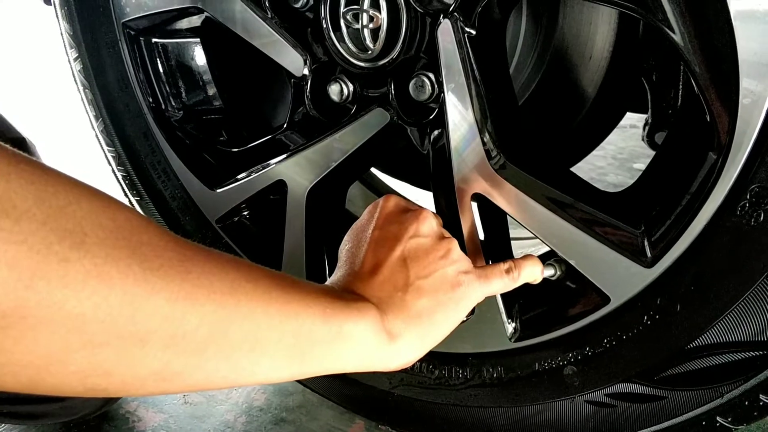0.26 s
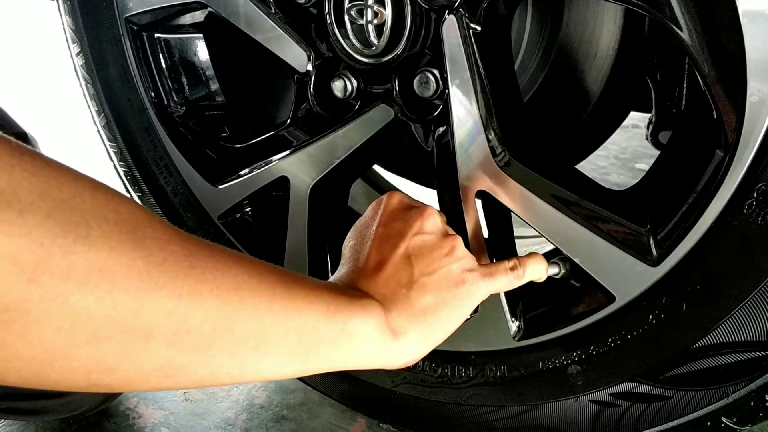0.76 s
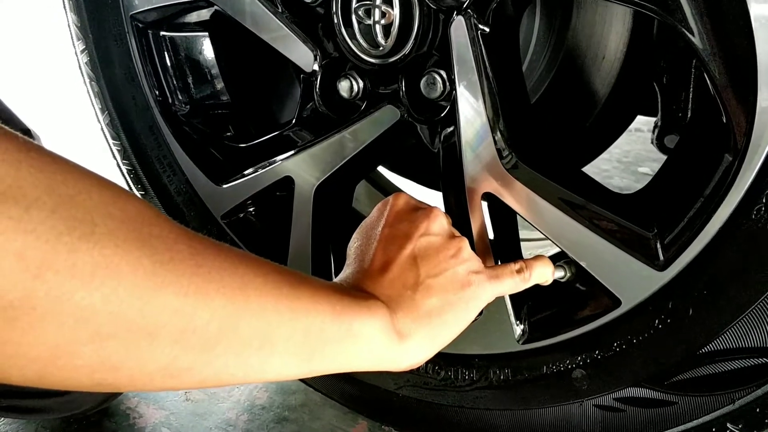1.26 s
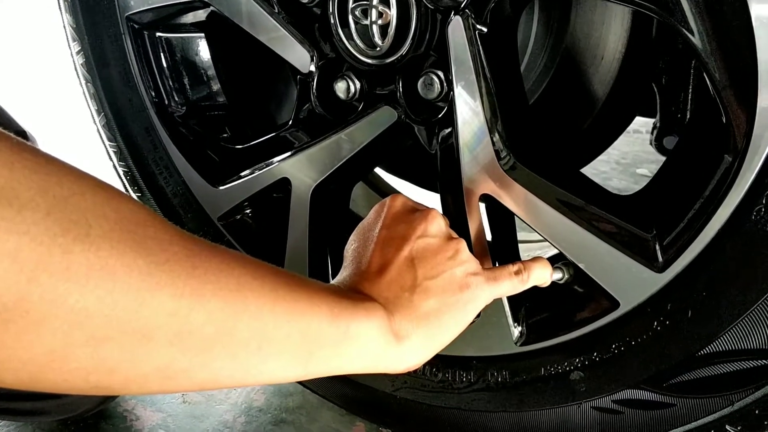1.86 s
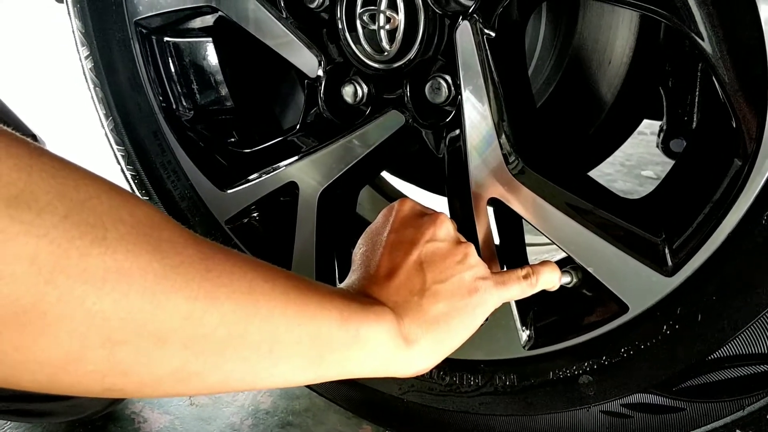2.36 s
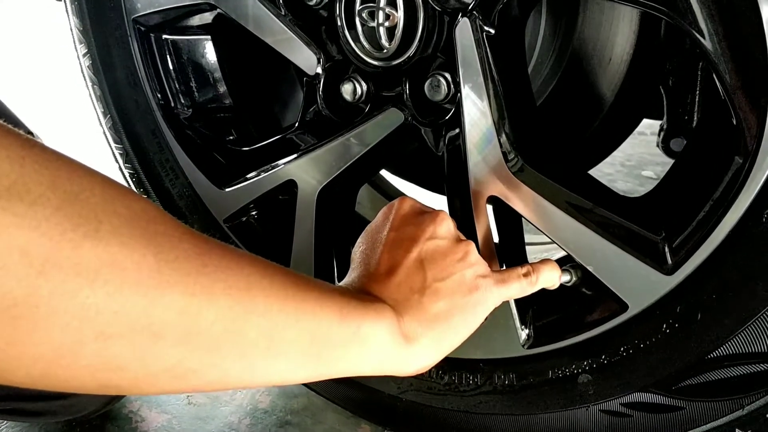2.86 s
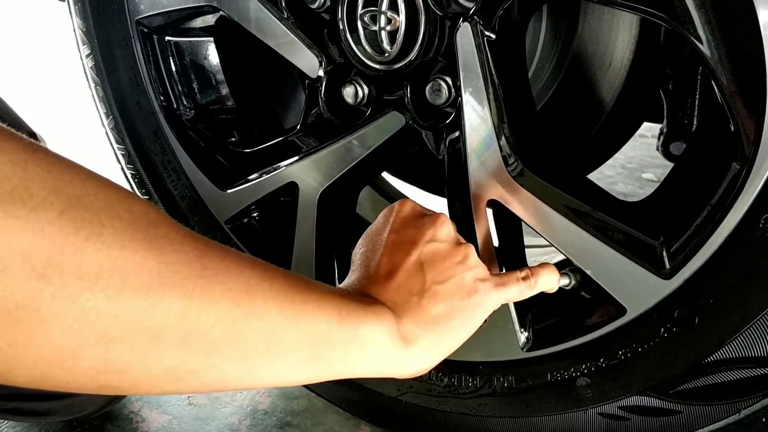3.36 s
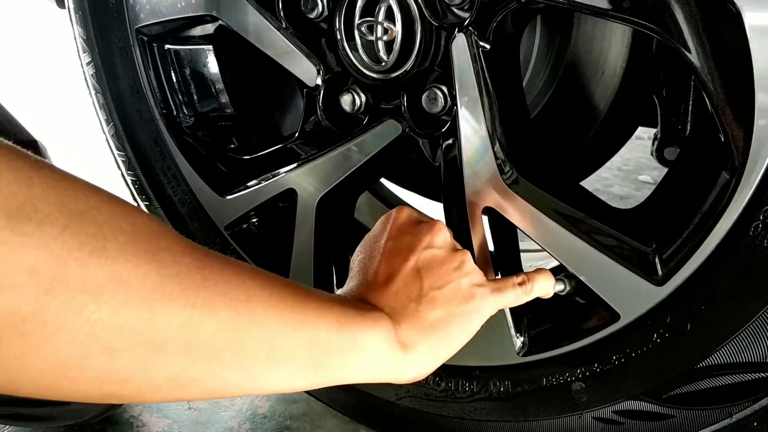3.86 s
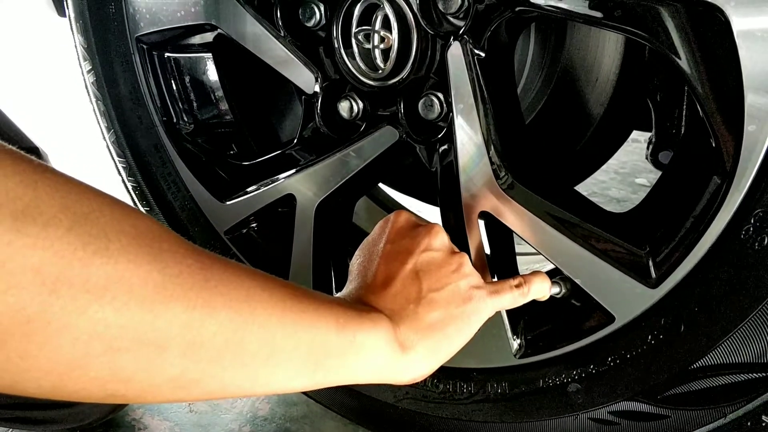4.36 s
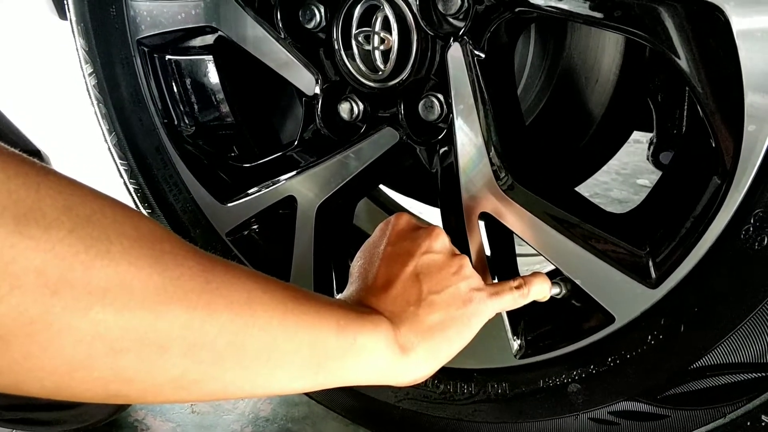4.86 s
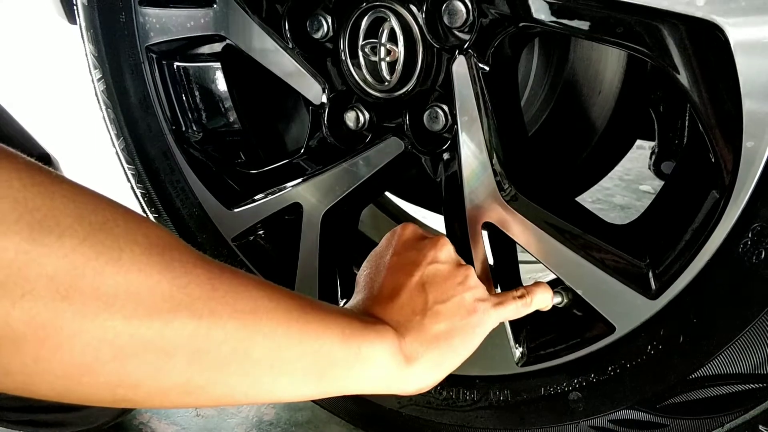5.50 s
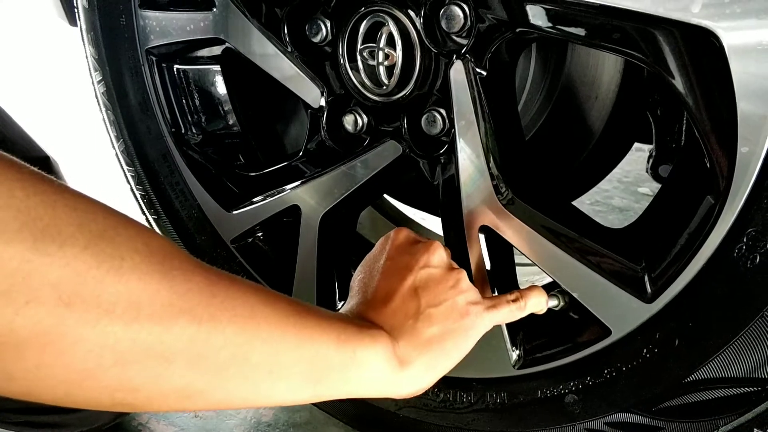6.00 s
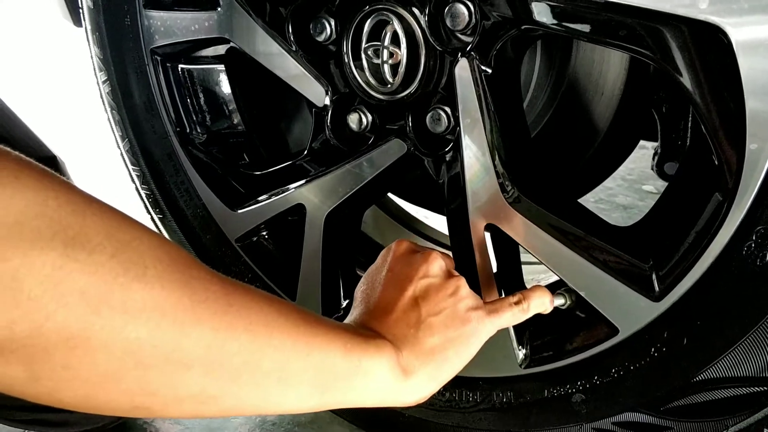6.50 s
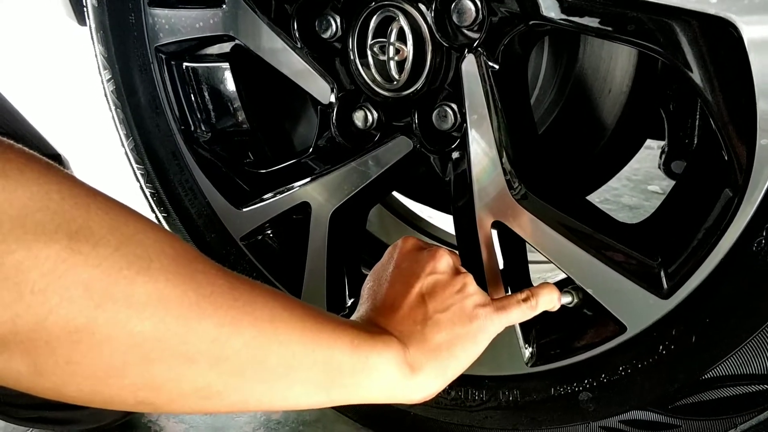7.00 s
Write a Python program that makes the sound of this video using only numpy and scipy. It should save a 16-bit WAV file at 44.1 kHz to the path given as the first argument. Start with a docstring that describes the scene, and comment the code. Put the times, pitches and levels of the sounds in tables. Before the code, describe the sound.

From the first instant, a loud, bright jet of air hisses from a car tyre valve close to a phone microphone, concentrated in the highs around 6 to 10 kHz with fine turbulent flicker and narrow metallic colouring. It eases slightly until 2.5 s, then sags and wavers. Between 2.8 and 3.5 s a dull, lumpy, hollow whoosh passes faintly underneath. From 3.7 to 5.1 s the hiss is clearly weaker and a little less bright, swelling at 5.3 s. Around 5.5 to 6.0 s it sputters: a deep dip, a short burst near 5.75 s, another dip. By 6.25 s it surges back to full strength and holds, still hissing when the sound cuts at about 7.2 s. A quiet low workshop rumble throbs throughout, mostly masked. Very short, dense wheel and floor reflections; mono, thin bass, steeply limited top.

```python
"""In a workshop, a fingertip holds down the pin of a car tyre valve, close to a mono phone microphone.
A low rumble is noise in throbbing bands; a dull whoosh is noise that passes once, in uneven bursts.
The air jet is flickering noise that swells and sags with the finger's pressure, coloured by spokes and rim;
dense reflections from wheel, arch and floor follow it."""
import sys
import numpy as np
from scipy import signal
from scipy.fft import rfft, irfft, next_fast_len
from scipy.io import wavfile
from scipy.ndimage import uniform_filter1d

SR = 44100
rng = np.random.default_rng(int(sys.argv[2]) if len(sys.argv) > 2 else 0)


def wrap_up_sound(samples):
    """Save the sound to the file named by the first command line argument, as 16-bit audio."""
    columns = np.atleast_2d(samples).T
    # keep every value between -1 and 1, then stretch to whole-number steps
    tamed = np.clip(columns, -1, 1)
    steps = np.round(tamed * 32767).astype(np.int16)
    wavfile.write(sys.argv[1], SR, steps)


N = 319271
SIZE = next_fast_len(N)
HZ = np.arange(SIZE // 2 + 1) * SR / SIZE + 1  # bin frequencies, raised 1 Hz so that their log exists


def undb(db):
    """Decibels are logarithmic: 20 dB is a factor of ten in amplitude."""
    return 10 ** (np.asarray(db) / 20)


def curve(rows):
    """Linear interpolation turns each column of a time table into a control signal."""
    seconds, *columns = np.transpose(rows)
    return [np.interp(np.arange(N) / SR, seconds, column) for column in columns]


def walk(rate):
    """Smoothed random process: levels held 1 / rate seconds, averaged twice, scaled to spread 1."""
    hold = int(SR / rate)
    steps = np.repeat(rng.standard_normal(N // hold + 1), hold)
    smooth = uniform_filter1d(uniform_filter1d(steps, hold), hold)[:N]
    return smooth / smooth.std()


def colour(x, gain_db):
    """Linear filtering: each frequency bin is multiplied by its own gain."""
    return irfft(rfft(x, SIZE) * undb(gain_db), SIZE)[:N]


def spectrum(points):
    """Spectral envelope in dB, linear in log frequency between points and falling away outside them."""
    hz, db = np.transpose(points)
    return np.interp(np.log(HZ), np.log([1, *hz, SR]), [db[0] - 43, *db, db[-1] - 60])


def unit(x):
    """Normalisation: the signal is divided by its standard deviation."""
    return x / x.std()


def restless(centres_hz, shared_db, own_db, quick_db, rate):
    """Amplitude modulation of noise: overlapping bands, one a row, flicker together and alone."""
    noise = rfft(rng.standard_normal(SIZE))
    place = np.interp(np.log(HZ), np.log(centres_hz), np.arange(len(centres_hz)))
    shared = shared_db * walk(rate)
    bands = []
    for k in range(len(centres_hz)):
        weight = np.clip(1 - abs(place - k), 0, 1)  # the triangular bands add up to 1
        flicker_db = shared + own_db * walk(rate / 2) + quick_db * walk(4 * rate)
        bands.append(irfft(noise * weight, SIZE)[:N] * undb(flicker_db))
    return np.array(bands)


def shop():
    """Band-limited noise, unevenly modulated: a workshop rumble that swells or dips around some pitch."""
    # Spectral envelope of the rumble. Each row: frequency in Hz, relative density in dB per Hz.
    rumble_spectrum = [(25, -50), (60, -30), (100, -16), (150, -3), (190, 5), (260, -3), (450, -8),
                       (750, -18.5), (1300, -20), (3000, -52)]
    # Local swells and dips. Each row: middle in seconds, half length in seconds, change in dB,
    # centre frequency in Hz, half width in octaves.
    swells = [(0.2, 0.27, -5, 420, 0.62), (2.71, 0.05, 3.5, 190, 0.5), (2.76, 0.034, 5, 350, 0.55),
              (2.84, 0.04, -4, 200, 0.6), (2.94, 0.025, 10, 230, 0.6), (3.04, 0.02, -9, 200, 0.6),
              (3.076, 0.015, 10, 200, 0.4), (3.13, 0.03, -6, 200, 0.5), (3.21, 0.025, 7, 240, 0.5),
              (3.41, 0.02, 5, 210, 0.4), (4.0, 0.48, 5.5, 443, 0.24), (4.433, 0.036, -5, 200, 0.53),
              (5.1, 0.24, 2.5, 240, 0.6), (6.447, 0.15, -6.5, 190, 1), (6.9, 0.68, -3, 200, 0.83)]
    steady_level_db = -41.5  # rms before the swells
    centres_hz = np.array([90, 150, 200, 260, 330, 420, 530, 670, 850, 1100])
    bands = restless(centres_hz, shared_db=0.85, own_db=0.9, quick_db=3.0, rate=14.)
    t = np.arange(N) / SR
    swell_db = 0
    for middle, half_s, db, hz, octaves in swells:
        distance = np.log2(centres_hz[:, None] / hz) / octaves
        swell_db = swell_db + db * np.exp(-((t - middle) / half_s) ** 2 - distance ** 2)
    steady = colour(bands.sum(axis=0), spectrum(rumble_spectrum))
    swelling = colour((bands * undb(swell_db)).sum(axis=0), spectrum(rumble_spectrum))
    return swelling / steady.std() * undb(steady_level_db)


def whoosh():
    """Noise under a spectral envelope with peaks: a short, dull, lumpy rush with a hollow ring."""
    # Spectral envelope of the rush. Each row: frequency in Hz, relative density in dB per Hz.
    rush_spectrum = [(90, -40), (170, -8), (260, -4), (430, 2.5), (520, -1), (600, 3.5), (700, -11),
                     (850, -7), (1030, -10), (1120, 1), (1210, 0), (1350, -6), (1900, -5), (2500, -6),
                     (3500, -28)]
    # Uneven bursts. Each row: time in seconds, level in dB.
    bursts = [(0, -90), (2.8, -72), (2.87, -46), (2.93, -38.5), (3.0, -38), (3.02, -43), (3.06, -39),
              (3.14, -39), (3.2, -41.5), (3.27, -49), (3.37, -42), (3.46, -41), (3.52, -65), (3.6, -90),
              (7.24, -90)]
    centres_hz = np.array([200, 300, 430, 600, 850, 1150, 1600, 2200])
    bands = restless(centres_hz, shared_db=1.1, own_db=2.5, quick_db=3.5, rate=8.)
    level_db, = curve(bursts)
    return unit(colour(bands.sum(axis=0), spectrum(rush_spectrum))) * undb(level_db)


def turbulence(tilt_db):
    """Turbulent jet noise: eddies flicker band by band, and the tilt acts on the lower bands."""
    centres_hz = np.array([700, 1200, 2000, 3000, 4200, 5500, 6800, 8000, 9000, 10000, 11000])
    eddies = restless(centres_hz, shared_db=0.39, own_db=0.28, quick_db=1.36, rate=17.)
    low_share = np.clip((7500 - centres_hz) / 3000, 0, 1)[:, None]  # full to 4500 Hz, none from 7500 Hz
    return (eddies * undb(low_share * tilt_db)).sum(axis=0)


def wheel(jet):
    """Resonance and cancellation: spokes, rim and hand lift or cut narrow bands as the grip moves."""
    # Broad colour of the turbulent jet. Each row: frequency in Hz, relative density in dB per Hz.
    jet_spectrum = [(120, -33), (650, -19.5), (1000, -21.5), (1300, -19), (1700, -20), (2500, -21.5),
                    (4000, -18.5), (5000, -13.5), (6500, -2.5), (8000, -7.5), (9000, 0.5), (9600, -3),
                    (10300, -7), (11250, -26.5)]
    # Narrow bands of spokes, rim and hand. Each row: centre in Hz, width in Hz,
    # gain in dB with a firm grip, with a slack grip and with a shifted grip.
    wheel_bands = [(638, 52, -10, 1.5, -10), (750, 36, 4, 8, 1), (1070, 210, -2.5, 3, -6),
                   (1347, 120, -8, -4, -7), (1540, 120, 4, -4.5, 3.5), (1995, 160, 7.5, 4, 2),
                   (2283, 84, 8.5, 9, -4), (2366, 112, -6, -8.5, 3.5), (2497, 63, 10, 8, -2),
                   (2670, 80, 2.5, 0.5, 5), (2828, 90, 7.5, 9, 7), (2918, 114, 5, 5, 3),
                   (2970, 53, -2, -2, 0), (3497, 510, 7, 6, 7), (3566, 120, 2.5, 2.5, 2.5),
                   (3660, 90, -3.5, -3, 0), (3960, 164, 10, 5.5, 9.5), (4343, 230, 7, 3, 5.5),
                   (4510, 81, 2.5, 2, 5), (4640, 92, 1.5, -5, 0), (4750, 272, -3.5, 0, -2.5),
                   (4970, 90, 0.5, 6, -6), (5130, 120, 5, 0.5, 0.5), (5400, 264, 8, 7.5, 5),
                   (5557, 150, -10, 0, -6), (5620, 70, 4, 2.5, 6), (5820, 350, 0, -5.5, -2.5),
                   (6610, 260, 1, -9.5, -9), (6754, 380, -10, -6, -2), (7010, 180, 3.5, -0.5, 2.5),
                   (7500, 120, 2, -5, -4), (7720, 180, 6, 6.5, -1), (7800, 250, -0.5, -5.5, 6),
                   (8120, 150, 5, 5, 4), (8546, 430, 3.5, 5.5, -2), (8770, 144, 2, 3.5, 1.5),
                   (9440, 260, 5.5, 4, 4.5), (9500, 117, 3.5, 3.5, 1.5)]
    # Course of the grip. Each row: time in seconds, grip (0 firm, 1 slack, 2 shifted; no unit).
    grip_course = [(0, 0), (1.2, 0.23), (2.5, 0.53), (3.5, 0.26), (4.2, 0.7), (4.7, 0.97), (5.4, 1),
                   (6.0, 0.7), (6.2, 1.2), (6.9, 2.5), (7.24, 1.9)]
    waver, waver_hz = 0.34, 4.5  # the hand never rests: spread of the grip, rate
    sway_share, sway_hz = .008, 6.  # offset of the bands as a share of their pitch, rate of sway
    grip = np.clip(curve(grip_course)[0] + waver * walk(waver_hz), 0, 2)
    sway = np.tanh(walk(sway_hz))
    out = 0
    for k in range(3):
        for side in (-1, 1):  # crossfade between bands set lower and higher
            ripple_db = 0
            for centre_hz, width_hz, *grip_db in wheel_bands:
                detuning = 2 * (HZ - centre_hz * (1 + side * sway_share)) / width_hz
                ripple_db = ripple_db + grip_db[k] / (1 + detuning ** 2)
            share = np.clip(1 - abs(grip - k), 0, 1) * (1 + side * sway) / 2
            out = out + share * unit(colour(jet, spectrum(jet_spectrum) + ripple_db))
    return out


def valve():
    """Flow noise: the finger's pressure on the pin sets the level and tilt of the escaping jet."""
    # The jet as the finger lets it out. Each row: time in seconds, level in dB,
    # lift of the lower hiss in dB (half of it at 6 kHz).
    flow = [(0.0, -15, -2), (0.52, -15.5, -0.5), (1.3, -17, -1), (2.45, -17, -1.1), (2.68, -22, 1.2),
            (2.76, -22, -0.5), (2.84, -19.5, -0.5), (2.94, -23.5, 3), (3.21, -18, -1.3), (3.38, -21, 1.3),
            (3.49, -20, -0.8), (3.57, -20.5, -0.1), (3.67, -27, 2.3), (3.8, -24.5, 0.5), (3.9, -25.5, 1.5),
            (3.96, -22, 2), (4.05, -22.5, 1.5), (4.3, -23.5, 3), (4.55, -23, 0.7), (4.8, -23, 1.3),
            (4.94, -26, 4), (5.1, -23.5, 1), (5.26, -19, 0), (5.4, -20, -1.3), (5.5, -26.5, 2.5),
            (5.58, -30, 4), (5.63, -26, 0.5), (5.67, -22, 0), (5.71, -20, -0.3), (5.75, -18.5, 0.5),
            (5.79, -22, 1), (5.87, -26, 1.5), (5.89, -28.5, 4), (5.93, -27.5, 2.5), (5.98, -29.5, 1),
            (6.01, -25, 0), (6.05, -20.5, 0.4), (6.13, -19, 0.5), (6.25, -15, -1), (6.6, -14.5, -1),
            (6.8, -14.5, -1), (6.9, -15, -1.9), (7.18, -15.5, -1.8), (7.24, -16, 0.5)]
    level_db, tilt_db = curve(flow)
    return wheel(turbulence(tilt_db)) * undb(level_db)


def echoes(x):
    """Convolution with decaying noise: reflections off wheel, arch and floor vary as arm and phone sway."""
    echo_db, t60_s = -5.5, 0.043  # strength against the direct sound, time to decay by 60 dB
    hold = int(.08 * SR)  # a new pattern starts every 80 ms
    t = np.arange(SR // 10) / SR
    fade = np.sin(np.pi * np.arange(2 * hold) / (2 * hold))  # patterns overlap at constant power
    padded = np.pad(x, (hold, 2 * hold))
    out = np.zeros(len(padded) + len(t))
    for start in range(0, N + hold, hold):
        response = rng.standard_normal(len(t)) * undb(-60 * t / t60_s) * (t > .002)
        response /= np.linalg.norm(response)
        piece = signal.fftconvolve(padded[start:start + 2 * hold] * fade, response)
        out[start:start + len(piece)] += piece
    return (x + undb(echo_db) * out[hold:hold + N]) / np.hypot(1, undb(echo_db))


def scene():
    """Superposition: the sources add at one microphone, which feeds both channels."""
    return np.tile(shop() + whoosh() + echoes(valve()), (2, 1))


def record(dry):
    """Band limiting: the phone thins the bass and cuts the top steeply."""
    low_hz, top_hz = 95, 11340
    thin = signal.sosfilt(signal.butter(2, low_hz, "high", fs=SR, output="sos"), dry)
    return signal.sosfilt(signal.ellip(16, .2, 60, top_hz, fs=SR, output="sos"), thin)


dry = scene()
out = record(dry)
wrap_up_sound(out)
```